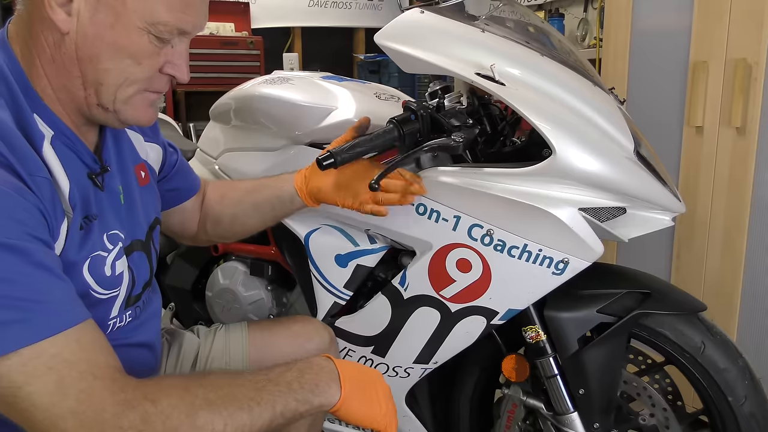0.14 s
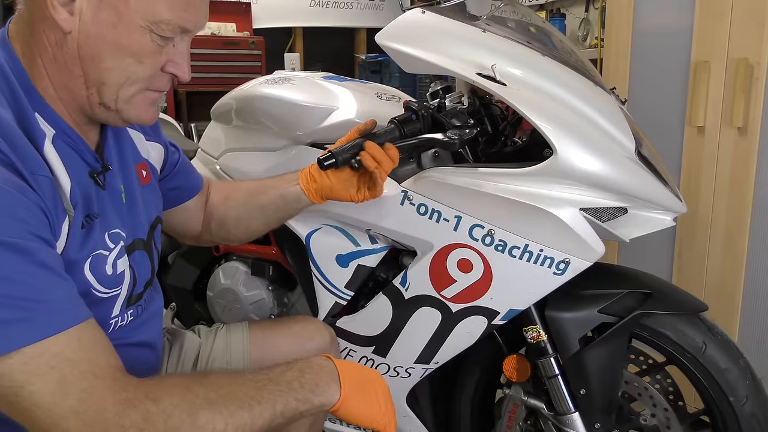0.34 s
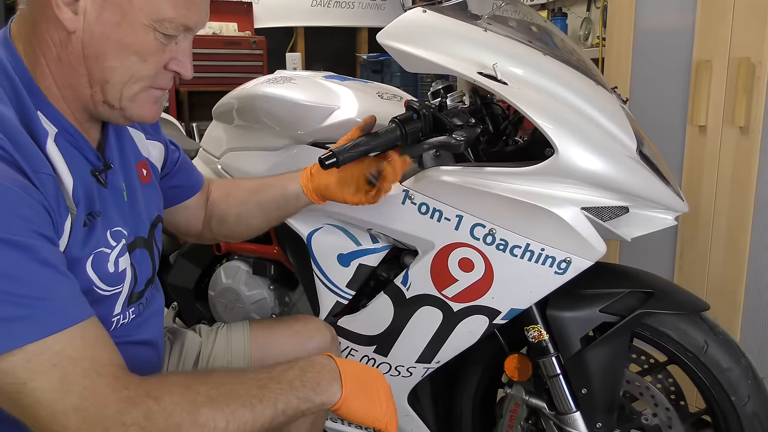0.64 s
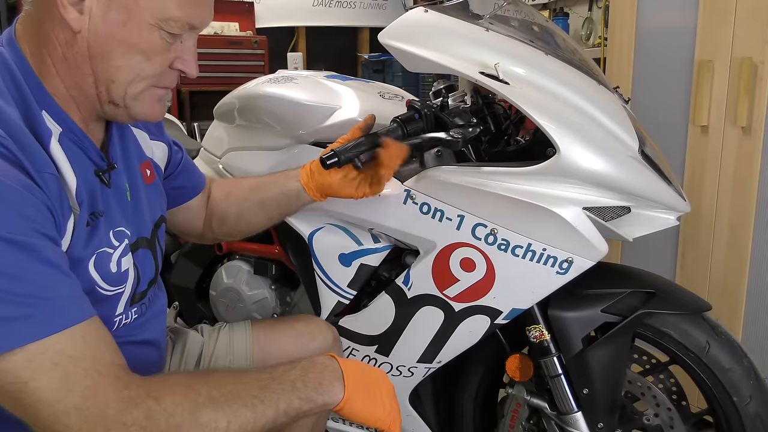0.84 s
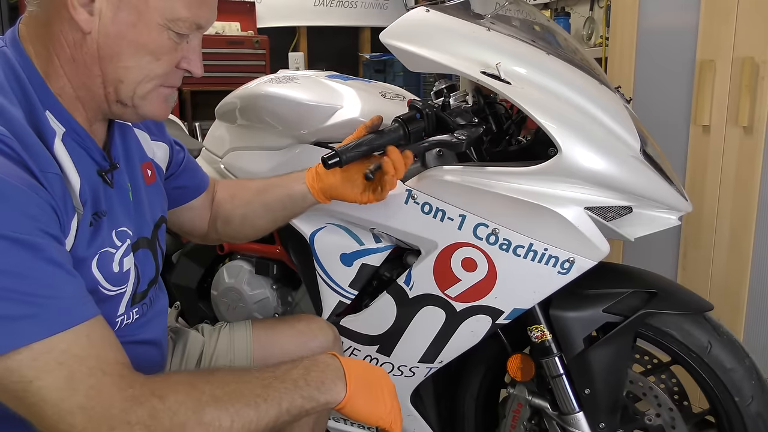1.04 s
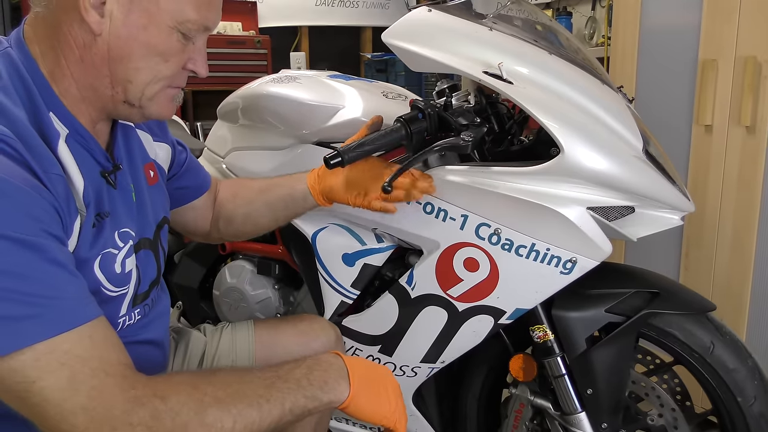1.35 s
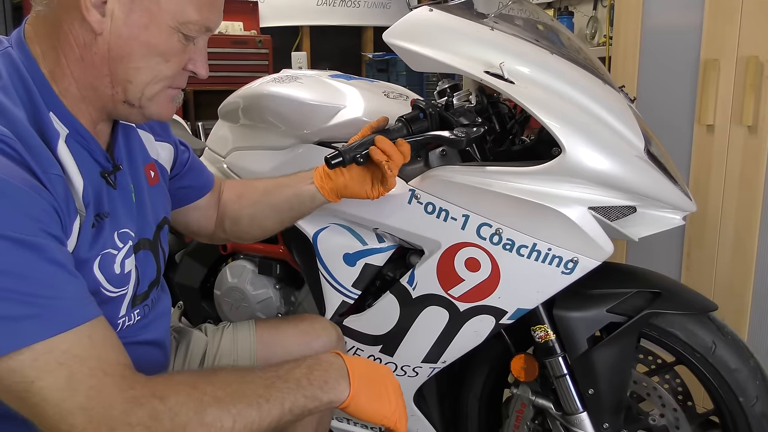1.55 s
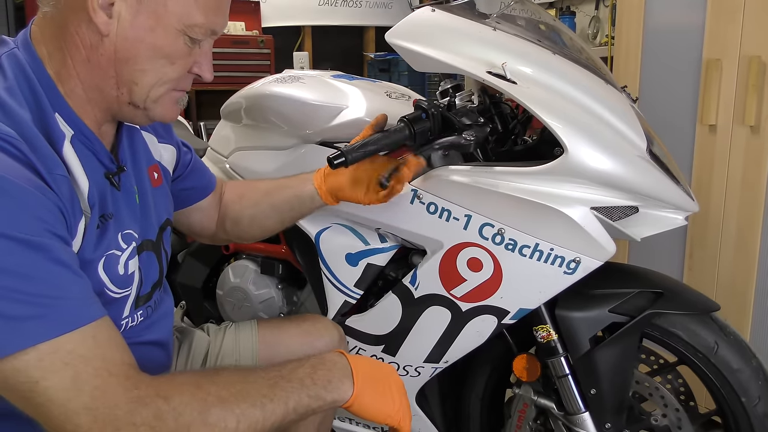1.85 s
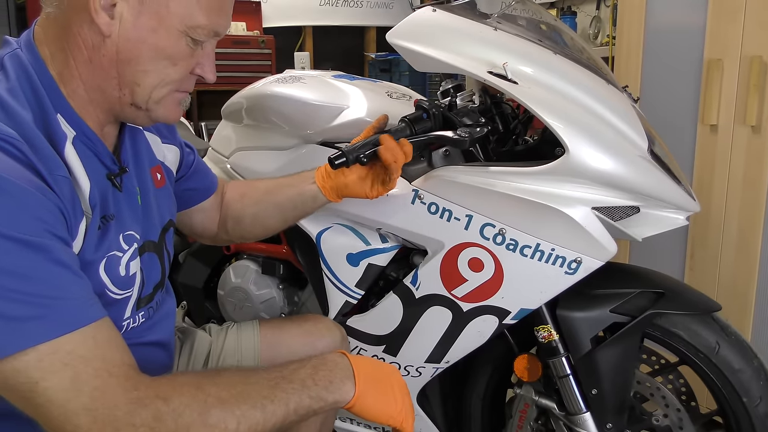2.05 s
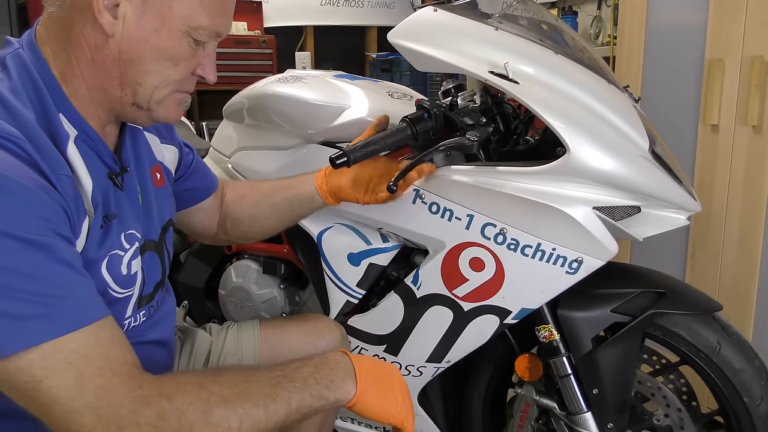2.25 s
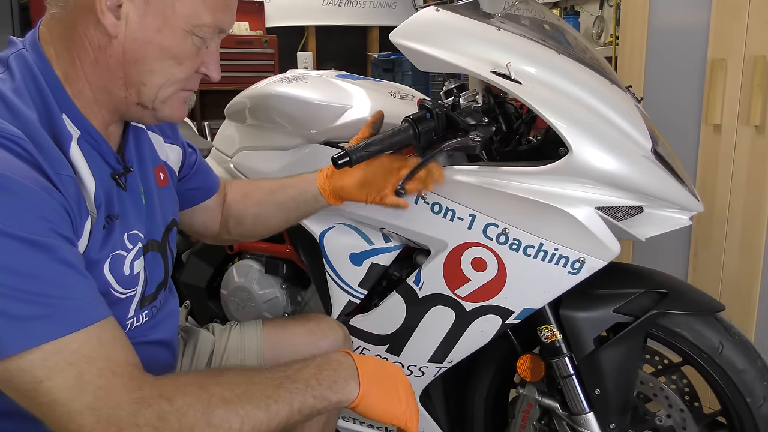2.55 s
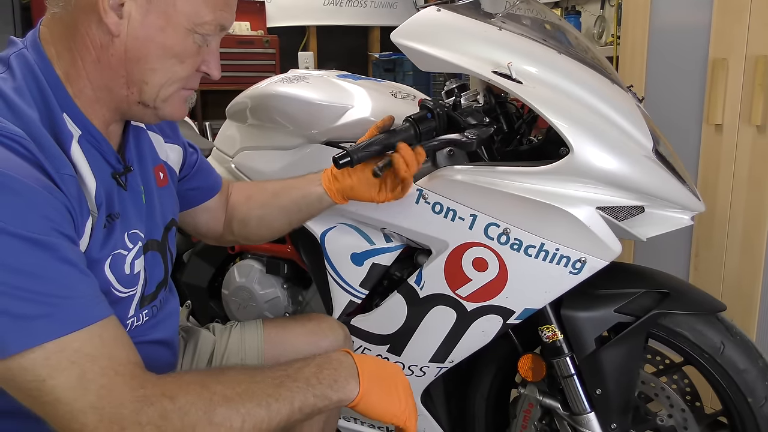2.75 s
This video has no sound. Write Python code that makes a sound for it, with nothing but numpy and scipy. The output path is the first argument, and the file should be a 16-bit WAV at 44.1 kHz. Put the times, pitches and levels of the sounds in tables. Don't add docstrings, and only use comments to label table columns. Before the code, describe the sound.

Seven quick, even pulls of a motorcycle hand lever: faint glove slip, bright snap and bounce, light landing, hollow return clack. Close microphone, short room reflections and low quiet room air.

```python
import sys
import numpy as np
from scipy import signal
from scipy.fft import rfft, irfft
from scipy.io import wavfile
from scipy.ndimage import uniform_filter1d

SR = 44100
rng = np.random.default_rng(int(sys.argv[2]) if len(sys.argv) > 2 else 0)


def pcm_store(signal):
    levels = np.round(np.clip(np.atleast_2d(signal), -1, 1) * 32767)
    wavfile.write(sys.argv[1], SR, levels.astype(np.int16).T)


def rack_gain(trim_db):
    fader = np.asarray(trim_db, float)
    return 10 ** (fader / 20)


N = 127890

# start in seconds, peak level in dB.
SNAPS = [
    (0.1171, -7),
    (0.4955, -7.5),
    (0.8983, -7),
    (1.282, -6.5),
    (1.711, -6.5),
    (2.134, -7),
    (2.555, -7),
]
# start in seconds, peak level in dB.
BOUNCES = [
    (0.1379, -11.5),
    (0.5147, -12.5),
    (0.9205, -13),
    (1.3043, -13.5),
    (1.735, -13.5),
    (2.1587, -13),
    (2.578, -14),
]
# start in seconds, peak level in dB.
LANDINGS = [
    (0.181, -19),
    (0.5536, -21.5),
    (0.9651, -18.5),
    (1.3475, -19),
    (1.7811, -18.5),
    (2.2029, -19),
    (2.6243, -19.5),
]
# start in seconds, peak level in dB, fairing knock level in dB.
RETURNS = [
    (0.2708, -18.5, -28.5),
    (0.6493, -17, -27),
    (1.039, -17.5, -24),
    (1.4364, -19, -35.5),
    (1.858, -19.5, -31.5),
    (2.3038, -18.5, -33),
    (2.7182, -18.5, -32),
]
# start in seconds, peak level in dB.
SLIPS = [
    (0.0852, -28.5),
    (0.4633, -26.5),
    (0.8672, -28),
    (1.2518, -28),
    (1.6805, -28),
    (2.1058, -28),
    (2.5225, -27.5),
]
# start in seconds, peak level in dB.
TICKS = [
    (0.7611, -32.5),
    (0.81, -40.5),
    (1.1448, -39),
    (1.1854, -35.5),
    (1.5508, -31.5),
    (1.9616, -29.5),
    (2.385, -45.5),
    (2.4096, -29),
    (2.823, -30.5),
    (2.8767, -43),
]
# start in seconds, peak level in dB.
CREAKS = [
    (1.6266, -31.5),
    (2.0452, -25),
    (2.4762, -34.5),
]
# start in seconds, frequency in Hz, level in dB.
BLIPS = [
    (1.625, 1730, -37),
    (2.044, 1744, -33.5),
    (2.322, 1854, -33),
    (2.738, 1783, -29),
    (1.879, 1800, -40),
    (2.483, 1710, -41),
]
# start in seconds, length in seconds, from Hz, to Hz, level in dB.
WHISTLES = [
    (0.0, .09, 13200, 11300, -67),
    (1.47, .15, 12600, 10100, -64),
]

# frequency in Hz, level in dB per Hz.
SNAP_COLOUR = [(590, -25), (1000, -10), (2190, -7), (3010, -3.5), (5050, -10), (7520, -3), (15400, -15),
               (16500, 1)]
BOUNCE_COLOUR = [(590, -38), (1000, -14), (3010, -8), (3680, -13), (7010, 2), (10600, -3), (16500, -13.5)]
LANDING_COLOUR = [(590, -34.5), (1000, -7), (3810, -14), (5950, -10), (6690, -4), (15000, -17.5),
                  (16500, -33)]
RETURN_COLOUR = [(590, -85), (1000, -19), (2530, -9), (5230, -13.5), (8460, 1), (15200, -13.5), (16500, 0)]
SLIP_COLOUR = [(940, -34), (1600, -12), (4050, -4), (8920, 4), (15300, -16), (16500, -26)]
TICK_COLOUR = [(590, -27), (1000, -6.5), (1910, 1), (3350, -14), (5810, -11.5), (16500, -24)]
CREAK_COLOUR = [(590, -59), (1000, -37), (2300, -7.5), (4330, -5), (6530, -14.5), (15600, -16),
                (16500, -37)]
# frequency in Hz, level in dB per Hz.
AIR_COLOUR = [(15, -41), (25, 8.5), (220, -3.5), (568, -7), (3230, -24.5), (6380, -26.5), (10400, -29),
              (15200, -40), (16500, -80)]
# frequency in Hz, level in dB, 60 dB decay in seconds.
METAL_MODES = [(1917, -20, 0.014), (2770, -30, 0.06), (3038, -1, 0.017), (4756, 1.5, 0.0094),
               (5925, -6, 0.016), (6220, 3, 0.011), (7343, -6.5, 0.0067), (7817, -4.5, 0.0075),
               (9032, -16.5, 0.0083), (10063, -9, .025)]
# frequency in Hz, level in dB, 60 dB decay in seconds.
FAIRING_MODES = [(308, -14.5, 0.047), (374, -9, 0.053), (483, -8.5, 0.049), (532.4, -0.5, 0.068),
                 (553.8, 0.5, 0.074), (599.7, -0.5, 0.075), (679, -2.5, 0.093), (741, -2.5, .05),
                 (842.5, -6.5, 0.07), (904, -4, 0.021), (933, -22, .05), (1212, -7, 0.041),
                 (1309, -9, 0.07), (1390, -23, 0.14)]

SNAP = dict(rise_ms=0.56, hold_ms=1.3, t60=0.023, db=2, knock_db=-14, knock_ms=0)
BOUNCE = dict(rise_ms=0.33, hold_ms=0.81, t60=0.041, db=-1, knock_db=-9.5, knock_ms=0.82)
LANDING = dict(rise_ms=2.34, hold_ms=1.5, t60=0.018, db=2, knock_db=-6, knock_ms=3.26)
AFTER = dict(rise_ms=1.5, hold_ms=3, t60=0.042, db=-0.5, knock_db=-8, knock_ms=1.53)
RETURN = dict(rise_ms=0.35, hold_ms=2.3, t60=0.051, db=-3, knock_db=5.5, knock_ms=11)
SLIP = dict(rise_ms=0.5, hold_ms=6.3, t60=0.025, db=-9.5, knock_db=-12, knock_ms=0.88)
TICK = dict(rise_ms=0.33, hold_ms=1, t60=0.017, db=-2, knock_db=-3.5, knock_ms=0.82)
CREAK = dict(rise_ms=1.2, hold_ms=4.5, t60=0.038, db=-6.5, knock_db=-26, knock_ms=0.87)
PRETICK = dict(rise_ms=0.17, hold_ms=0.67, t60=0.028, db=-1, knock_db=-14, knock_ms=0.86)

PRETICK_LEAD_S, PRETICK_DB = 0.0073, -14
SLIP_AGAIN_S, SLIP_AGAIN_DB = 0.006, -2.5
AFTER_LANDING_S, AFTER_LANDING_DB = (0.011, 0.019, 0.036), (-7, -17, -15)
AFTER_KNOCK_DB = 12.5
SNAP_THUMP_DB = 5
CRACK_DB, CRACK_DELAY_S = 4, 0.0008
SAME_SHARE = 0.65
GRAIN_DB = 3.5
METAL_DB, RATTLE_DB, FAIRING_DB = -36, -5.5, -34
FAIRING_LOW_HZ = 319
KNOCK_RISE_S, KNOCK_HOLD_S, KNOCK_T60_S = 0.00074, 0.0012, 0.068
BLIP_RISE_S, BLIP_T60_S = 0.0019, 0.025
CREAK_FROM_HZ, CREAK_TO_HZ, CREAK_SWEEP_S, CREAK_SWEEP_DB = 2500, 5240, 0.0035, -20.5
SWAY_HZ, SWAY_DEEP_HZ, SWAY_DEEP_DB = 36.1, 28.5, -6.5
SWAY_T60_S, SWAY_SOFT_HZ = 0.072, 119
SWAY_LEAD_S, SWAY_DB = (0.0048, 0.00044, 0.00017, 0.00033, 0.00086), (-26, -24, -21, -6.5, -13)
ROOM_DB, ROOM_T60_S, WALL_CUT_HZ = -11, 0.45, 1140
ROOM_HIGH_DB, ROOM_HIGH_T60_S, ROOM_ONSET_S = -3, 0.26, 0.012
AIR_DB = -48
MIC_LOW_HZ, MIC_TOP_HZ = 14, 16150


def lever():
    snaps, landings = np.array(SNAPS), np.array(LANDINGS)
    preticks = snaps + [-PRETICK_LEAD_S, PRETICK_DB]
    after = np.vstack([landings + [s, db] for s, db in zip(AFTER_LANDING_S, AFTER_LANDING_DB)])
    slips = np.vstack([SLIPS, np.add(SLIPS, [SLIP_AGAIN_S, SLIP_AGAIN_DB])])
    after_gain = rack_gain(np.array([[0], [AFTER_KNOCK_DB]]))
    rattle, push = (contact(snaps, SNAP, SNAP_COLOUR)
                    + contact(BOUNCES, BOUNCE, BOUNCE_COLOUR)
                    + contact(preticks, PRETICK, LANDING_COLOUR)
                    + contact(landings, LANDING, LANDING_COLOUR)
                    + contact(after, AFTER, LANDING_COLOUR) * after_gain
                    + contact(RETURNS, RETURN, RETURN_COLOUR)
                    + contact(slips, SLIP, SLIP_COLOUR)
                    + contact(TICKS, TICK, TICK_COLOUR)
                    + contact(CREAKS, CREAK, CREAK_COLOUR))
    metal = sum(rack_gain(METAL_DB + db) * ring(rattle, hz, t60) for hz, db, t60 in METAL_MODES)
    push[(snaps[:, 0] * SR).astype(int)] += rack_gain(snaps[:, 1] + SNAP_THUMP_DB)
    push = signal.sosfilt(signal.butter(2, FAIRING_LOW_HZ, "high", fs=SR, output="sos"), push)
    fairing = sum(rack_gain(FAIRING_DB + db) * ring(push, hz, t60) for hz, db, t60 in FAIRING_MODES)
    return rack_gain(RATTLE_DB) * rattle + metal + fairing + cracks() + blips() + creaks()


def contact(rows, kind, points):
    rows = np.array(rows)
    grain = burst(rows, kind["rise_ms"] / 1000, kind["hold_ms"] / 1000, kind["t60"])
    rattle = rack_gain(kind["db"]) * colour(grain, points)
    knocks = np.c_[rows[:, 0] + kind["knock_ms"] / 1000, rows[:, -1] + kind["knock_db"]]
    push = burst(knocks, KNOCK_RISE_S, KNOCK_HOLD_S, KNOCK_T60_S)
    return np.array([rattle, push])


def burst(rows, rise, hold, t60):
    alike = shape(rows, rise, hold, t60, grains()[:SR // 4])
    fresh = grains() * shape(rows, rise, hold, t60)
    return np.sqrt(SAME_SHARE) * alike + np.sqrt(1 - SAME_SHARE) * fresh


def grains():
    size_db = GRAIN_DB * np.minimum(rng.exponential(1, N), 4)
    return rms_one(rng.standard_normal(N) * rack_gain(size_db))


def shape(rows, rise, hold, t60, same=1):
    out = np.zeros(N + SR)
    t = np.arange(SR // 4) / SR
    fall = rack_gain(-60 * np.maximum(t - rise - hold, 0) / t60)
    one = same * np.clip(t / max(rise, 1e-5), 0, 1) * fall
    for s, db in np.array(rows)[:, :2]:
        start = int(s * SR)
        out[start:start + len(t)] += rack_gain(db) * one
    return out[:N]


def cracks():
    clicks, rows = np.zeros(N), np.array(SNAPS)
    clicks[((rows[:, 0] + CRACK_DELAY_S) * SR).astype(int)] = -rack_gain(rows[:, 1] + CRACK_DB)
    return colour(clicks, SNAP_COLOUR)


def blips():
    t, out = np.arange(N) / SR, np.zeros(N)
    for s, hz, db in BLIPS:
        out += shape([(s, db)], BLIP_RISE_S, 0, BLIP_T60_S) * np.sin(2 * np.pi * hz * t)
    return out


def creaks():
    t, out = np.arange(N) / SR, np.zeros(N)
    for s, db in CREAKS:
        hz = CREAK_FROM_HZ + (CREAK_TO_HZ - CREAK_FROM_HZ) * np.clip((t - s) / CREAK_SWEEP_S, 0, 1)
        rough = rms_one(uniform_filter1d(rng.standard_normal(N), size=40))
        envelope = shape([(s, db + CREAK_SWEEP_DB)], 0.0011, CREAK_SWEEP_S, 0.043)
        out += envelope * rough * np.sin(2 * np.pi * np.cumsum(hz) / SR)
    return out


def sway():
    kicks = np.zeros(N)
    events = (SNAPS, BOUNCES, LANDINGS, RETURNS, CREAKS)
    follows_peak = (False, False, False, True, True)
    for rows, lead, db, own in zip(events, SWAY_LEAD_S, SWAY_DB, follows_peak):
        rows = np.array(rows)
        kicks[((rows[:, 0] - lead) * SR).astype(int)] += rack_gain(db + own * rows[:, 1])
    soft = signal.sosfilt(signal.butter(2, SWAY_SOFT_HZ, fs=SR, output="sos"), kicks)
    deep = rack_gain(SWAY_DEEP_DB) * ring(soft, SWAY_DEEP_HZ, SWAY_T60_S)
    return ring(soft, SWAY_HZ, SWAY_T60_S) + deep


def whistles():
    t, out = np.arange(N) / SR, np.zeros(N)
    waver = 1 + 0.5 * rms_one(uniform_filter1d(rng.standard_normal(N), size=300))
    for s, length, from_hz, to_hz, db in WHISTLES:
        u = np.clip((t - s) / length, 0, 1)
        hz = from_hz + (to_hz - from_hz) * u ** 1.5
        out += rack_gain(db) * np.sin(np.pi * u) * np.sin(2 * np.pi * np.cumsum(hz) / SR)
    return out * waver


def workshop(x):
    t = np.arange(SR // 2) / SR
    white = rng.standard_normal(len(t))
    low = signal.sosfilt(signal.butter(1, WALL_CUT_HZ, fs=SR, output="sos"), white)
    high_tail = rack_gain(ROOM_HIGH_DB) * (white - low) * rack_gain(-60 * t / ROOM_HIGH_T60_S)
    tail = low * rack_gain(-60 * t / ROOM_T60_S) + high_tail
    tail = tail * np.clip(t / ROOM_ONSET_S, 0, 1) ** 2
    return signal.fftconvolve(x, tail / np.sqrt(np.sum(tail ** 2)))[:N]


def air():
    return rack_gain(AIR_DB) * rms_one(colour(rng.standard_normal(N), AIR_COLOUR))


def ring(x, hz, t60):
    r, w = rack_gain(-60 / (t60 * SR)), 2 * np.pi * hz / SR
    return signal.lfilter([0, np.sin(w)], [1, -2 * r * np.cos(w), r * r], x + 1e-18)


def colour(x, points):
    hz, db = np.transpose(points)
    grid = np.maximum(np.fft.rfftfreq(4096, 1 / SR), 5)
    level = np.interp(np.log(grid), np.log(hz), db)
    level = level - 18 * np.maximum(np.log2(hz[0] / grid), 0)
    cepstrum = irfft(level * np.log(10) / 20)
    cepstrum[1:2048] *= 2
    cepstrum[2049:] = 0
    pulse = irfft(np.exp(rfft(cepstrum)))
    return signal.fftconvolve(x, pulse / np.sqrt(np.sum(pulse ** 2)))[:N]


def rms_one(x):
    return x / np.sqrt(np.mean(x ** 2) + 1e-20)


def scene():
    near = lever()
    return (near + rack_gain(ROOM_DB) * workshop(near) + sway() + whistles() + air())[None]


def band_limit(x):
    return signal.sosfilt(signal.butter(12, 17150, fs=SR, output="sos"), x)


def record(dry):
    dry = signal.sosfilt(signal.butter(1, MIC_LOW_HZ, "high", fs=SR, output="sos"), dry)
    mix = signal.sosfilt(signal.cheby2(12, 38, MIC_TOP_HZ, fs=SR, output="sos"), dry)
    return band_limit(mix)


dry = scene()
out = record(dry)
pcm_store(out)
```